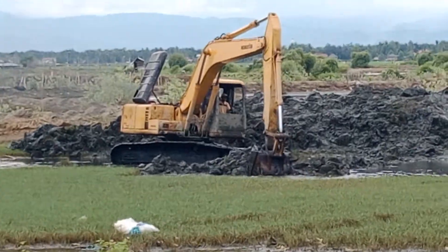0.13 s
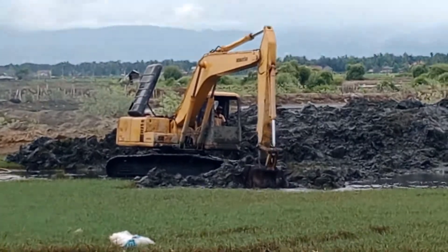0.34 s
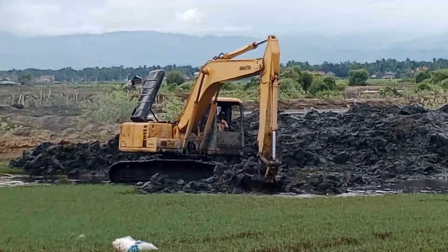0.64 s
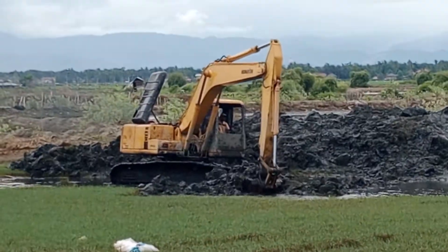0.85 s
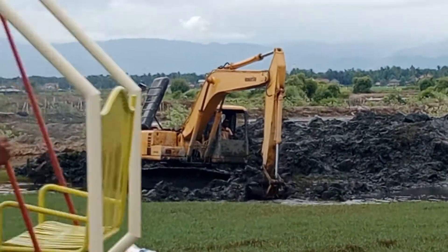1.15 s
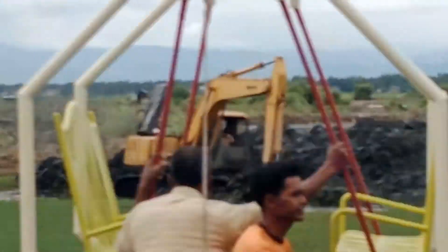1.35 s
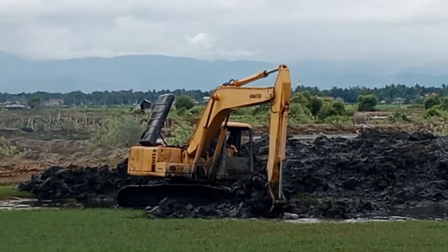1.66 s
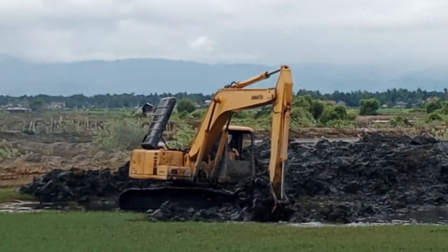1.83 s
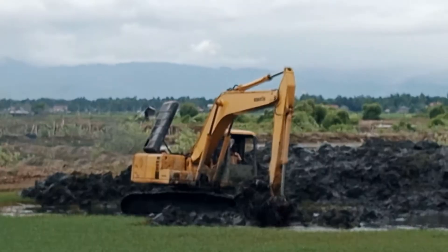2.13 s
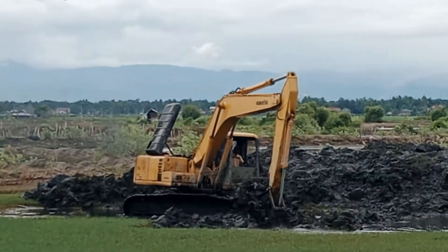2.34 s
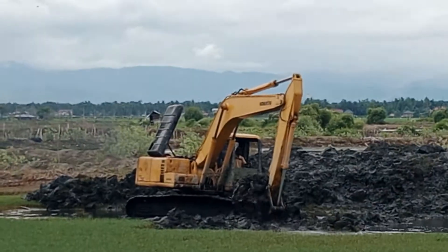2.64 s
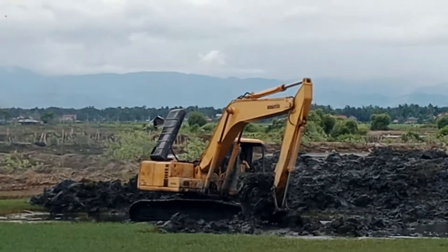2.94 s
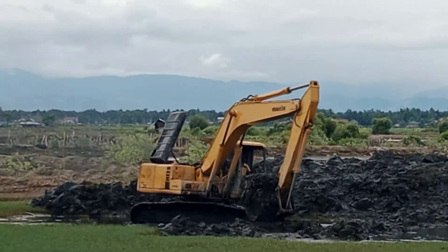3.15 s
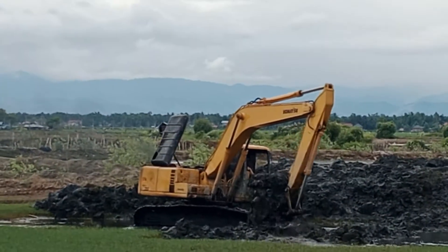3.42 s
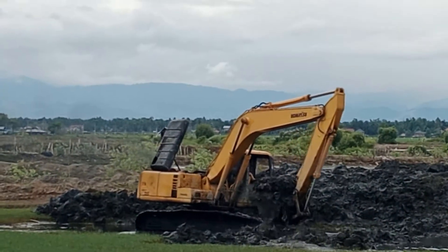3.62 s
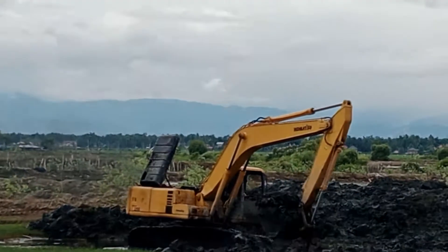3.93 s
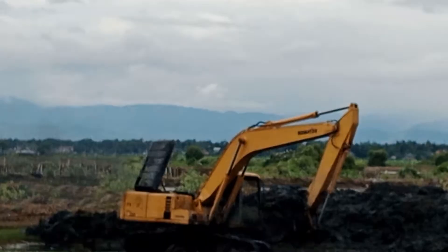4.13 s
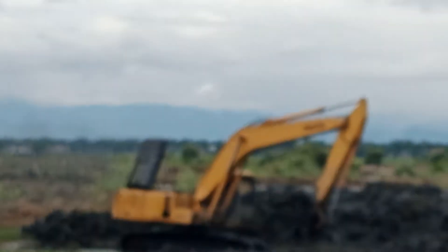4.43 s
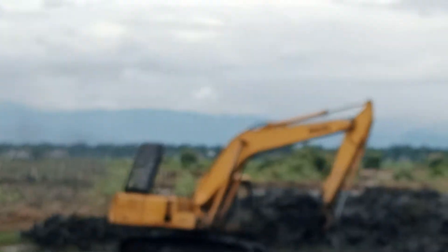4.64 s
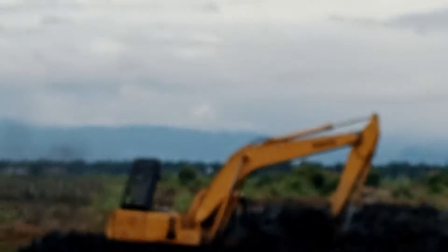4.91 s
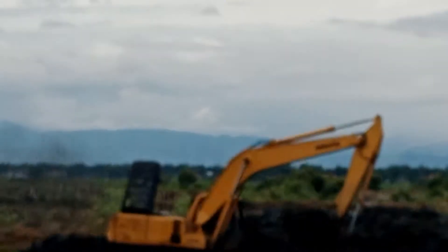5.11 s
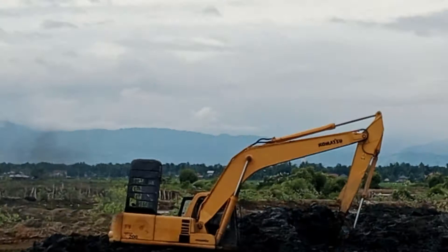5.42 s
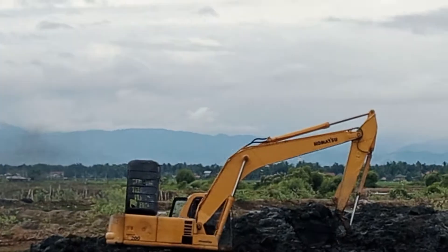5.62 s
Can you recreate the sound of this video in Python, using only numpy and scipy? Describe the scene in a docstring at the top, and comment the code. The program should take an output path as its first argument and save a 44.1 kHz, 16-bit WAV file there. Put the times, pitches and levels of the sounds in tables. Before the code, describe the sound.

A tracked excavator's diesel chugs rapidly outdoors, swelling to a loud clattering roar, then settling to a quieter steady run with ticks and watery bubbling.

```python
"""A diesel excavator chugs across an open field: about 27 beats a second, each a boom, a bark and a puff of gas.
The exhaust is firing pulses and gated noise rung through pipe colours; the block clatters and ticks in shaped noise.
Struck panels ring, a turbocharger hisses, a sine drone and singing oil bands join under load, then bubbles pour.
Sharp ticks, faint chirps and peeps, and low field air sit around it; the ground bounce carves sliding notches."""
import sys
import numpy as np
from scipy import signal
from scipy.fft import rfft, irfft, next_fast_len
from scipy.io import wavfile
from scipy.ndimage import uniform_filter1d, map_coordinates

SR = 44100
rng = np.random.default_rng(int(sys.argv[2]) if len(sys.argv) > 2 else 0)


def persist_wave(psi):
    """Save psi, clipped to +-1, as 16-bit WAV."""
    counts = np.round(np.clip(psi, -1, 1) * 32767).astype(np.int16)
    wavfile.write(sys.argv[1], SR, np.atleast_2d(counts).T)


N = 254456
TIME = np.arange(N) / SR

# Levels in the tables are the moves over time; the functions add their own trims on top.
# Firing speed of the engine: time_s, speed_beats_per_s
ENGINE_SPEED = [(0.0, 27.03), (0.8, 27.21), (1.6, 27.1), (2.4, 27.18), (2.9, 27.3), (3.2, 26.81),
                (3.45, 27.56), (3.8, 27.47), (4.15, 27.36), (4.5, 27.18), (4.9, 27.42), (5.25, 27.61),
                (5.77, 26.81)]
# Effort heard in the exhaust: time_s, boom_db, bark_db
EXHAUST_LEVELS = [(0, -37.5, -38), (0.3, -38, -39.5), (0.65, -30.5, -33), (1.0, -25.5, -30),
                  (1.45, -23.5, -30), (1.95, -22.5, -30.5), (2.15, -24, -35.5), (2.3, -25, -32),
                  (2.55, -29, -36.5), (2.8, -33, -37), (3.25, -40.5, -60), (3.8, -34.5, -59),
                  (4.3, -38.5, -54), (5.0, -38, -58), (5.77, -37, -62)]
# Surges, a few harder or softer firings in a row: time_s, half_length_s, boom_gain_db, bark_gain_db
FIRING_SURGES = [(0.143, 0.042, 6.5, 4), (0.245, 0.015, -1, 4), (0.38, 0.02, 8, 4), (0.532, .016, 1.5, 4),
                 (2.558, 0.067, 5, 2), (2.978, 0.085, 4, -6), (3.093, 0.014, 8.5, 12),
                 (3.34, 0.072, 5, 13.5), (3.453, 0.04, 3, 7), (3.67, .04, 3.5, 6), (3.855, .04, 3, -15),
                 (3.93, 0.046, 0.5, 0), (4.237, 0.042, 8, -1), (4.41, 0.032, -3.5, -5),
                 (4.52, 0.066, 4, 1.5), (4.711, 0.076, -7, 12.5), (5.385, 0.027, 4.5, 4),
                 (5.491, 0.01, 7, 11)]
# Balance of the boom, upper half over lower half: time_s, tilt_db
BOOM_LEAN = [(0, 15), (.12, 12), (.3, -4), (.55, -9), (.85, 5), (1.2, 2.7), (1.5, -8), (1.85, 7.5),
             (2.32, 7), (2.55, 21.5), (2.8, 5), (3.1, -2), (3.5, 0), (3.68, 18), (3.9, 2), (4.3, -4.5),
             (4.9, 1), (5.77, -3.5)]
# Colour of the silencer's boom: frequency_hz, relative_level_db
BOOM_COLOUR = [(12, -55), (27, -49), (54, -26), (82, -23), (109, -1), (136, 12.5), (163, 9.5), (190, 6.5),
               (220, -52), (300, -10.5), (600, -53.5), (3000, -120)]
# Colour of the pipe's bark: frequency_hz, relative_level_db
BARK_COLOUR = [(25, -27), (55, -33.5), (90, 9.5), (180, -28.5), (275, 5.5), (410, -2.5), (520, -9),
               (680, -15), (1000, -34.5), (1600, -26.5), (3000, -57), (7000, -120)]
# Colour of the gas puffs: frequency_hz, relative_level_db
GAS_COLOUR = [(12, -43), (35, -28), (70, -21.5), (200, -2.5), (320, 4.5), (450, 5.5), (600, 1), (800, -3.5),
              (1100, -35), (1600, -23), (3000, -59), (7000, -91)]
# Colour of the rumble under the boom: frequency_hz, relative_level_db
RUMBLE_COLOUR = [(25, -36), (50, -10), (78, -3), (110, 10), (250, -39.5)]
# Noises of the engine block: time_s, clatter_db, rasp_db, hiss_db, tick_spray_db
BLOCK_LEVELS = [(0, -45.5, -68.5, -60.5, -76), (0.35, -44, -66, -56, -79), (0.41, -42.5, -60, -54.5, -64),
                (0.55, -41.5, -61, -52.5, -66), (0.8, -41, -62.5, -51, -58), (1.2, -38.5, -60, -47.5, -53),
                (1.65, -40.5, -51.5, -46.5, -60), (1.9, -40, -53, -46, -60), (2.0, -44, -52, -48, -71),
                (2.08, -42, -51, -44, -59), (2.15, -44, -55, -50, -67), (2.35, -43, -55, -46.5, -58.5),
                (2.75, -47.5, -56, -50.5, -63), (3.15, -50.5, -74.5, -54.5, -74.5),
                (4.1, -55, -74.5, -57.5, -81.5), (4.7, -52.5, -76.5, -56.5, -76),
                (4.9, -51, -76, -56.5, -77), (5.3, -48, -78.5, -54.5, -72), (5.53, -50.5, -80, -52.5, -68),
                (5.61, -46.5, -84, -50, -63), (5.77, -45.5, -74, -47.5, -60)]
# Colour of the clatter: frequency_hz, relative_level_db
CLATTER_COLOUR = [(400, -12.5), (800, -6), (1150, 1), (1500, 1), (2000, -2.5), (2300, -10), (2700, -20),
                  (4000, -90), (6000, -45.5)]
# Colour of the rasp: frequency_hz, relative_level_db
RASP_COLOUR = [(1500, 2.5), (2300, 3), (2800, 0.5), (3400, -1.5), (4000, -1.5), (4400, -8.5), (4800, -26.5),
               (5600, -2.5), (6500, -28), (9000, -29)]
# Colour of the hiss: frequency_hz, relative_level_db
HISS_COLOUR = [(4000, -26), (4900, -12.5), (5700, 2.5), (6500, 4), (7600, 8.5), (8600, 8.5), (9300, -0.5),
               (10100, 0), (11300, -35), (15500, -45)]
# Colour of the tick spray: frequency_hz, relative_level_db
SPRAY_COLOUR = [(5000, -36.5), (8000, 3), (10500, 3.5), (11500, -0.5), (12700, 4), (14200, -7), (15500, -8)]
# Brief swells and lulls of the clatter and the oil: time_s, half_length_s, gain_db
BRIEF_SWELLS = [(.62, .1, 1.5), (2.17, .035, -5), (2.59, .05, 4), (2.83, .04, -4), (2.95, .05, 2),
                (3.16, .02, -4), (3.29, .035, -7), (3.42, .06, 2), (3.62, .04, -3.5), (3.76, .035, -6),
                (3.87, .05, 3), (4.04, .02, -3), (4.12, .03, 2), (5.62, .05, 2)]
# Ground bounce, where a negative depth lifts: time_s, notch_hz, notch_depth_db, upper_depth_db, low_depth_db
GROUND_BOUNCE = [(0, 2930, 7, 12, 19), (.7, 2920, 17.5, 18, 0), (1.1, 3180, 8, 9, -4),
                 (1.45, 3900, 18, 11, -6.5), (1.75, 4420, 33, 10.5, -6.5), (2.15, 4720, 30, -4, -1),
                 (3.2, 5080, 32, -5, 5), (3.9, 5240, 31, -9, 4), (4.7, 5850, 22, -5, 2.5),
                 (5.77, 6020, 22, -7.5, -1)]
# Spells of a ringing pipe or panel: start_s, end_s, first_pitch_hz, last_pitch_hz, level_db
PANEL_RINGS = [(.04, .95, 760, 755, -43.5), (.3, 1.3, 505, 515, -45), (0, .55, 1430, 1430, -51),
               (0, .75, 2730, 2730, -65), (.15, 1.0, 405, 405, -44.5), (.7, 1.35, 1140, 1140, -45),
               (2.15, 2.7, 910, 870, -46), (2.68, 3.0, 875, 890, -45.5), (3.0, 3.17, 900, 980, -51),
               (3.27, 3.52, 985, 1000, -53), (2.7, 3.55, 300, 320, -44), (3.44, 3.98, 410, 405, -52),
               (3.55, 4.5, 325, 325, -52), (3.18, 3.84, 790, 805, -54), (3.84, 4.85, 790, 790, -64),
               (4.45, 5.45, 7790, 7790, -62), (5.57, 5.68, 610, 630, -50), (5.63, 5.85, 1010, 990, -48),
               (3.86, 3.99, 440, 440, -56), (4.65, 4.74, 510, 510, -54)]
# Two singing resonances of the oil: time_s, lower_hz, lower_db, upper_hz, upper_db
OIL_SONG = [(2.7, 1480, -64, 2000, -60), (3.0, 1440, -62, 1980, -54), (3.42, 1480, -55, 2010, -55),
            (3.7, 1450, -58, 1960, -56), (3.9, 1500, -59, 1990, -55), (4.15, 1450, -57, 1980, -54),
            (4.52, 1520, -56, 1890, -52), (4.7, 1500, -52, 1880, -59), (4.94, 1300, -57, 1900, -57),
            (5.06, 1170, -49, 1870, -51), (5.26, 1270, -49, 1830, -49), (5.32, 1220, -50, 1900, -59),
            (5.41, 1190, -44.5, 1900, -59), (5.53, 1090, -49, 1800, -58), (5.6, 1080, -49, 1850, -51),
            (5.77, 1010, -48, 1780, -52)]
# Muddy water pouring from the lifted bucket: time_s, level_db
POUR_LEVEL = [(4.6, -72), (4.82, -56), (4.94, -61), (5.04, -52), (5.26, -49), (5.33, -58), (5.45, -55),
              (5.55, -57), (5.63, -42), (5.7, -46), (5.77, -50)]
# Sharp metal ticks: start_s, peak_db, pitch_hz
METAL_TICKS = [(3.468, -41, 8200), (4.425, -48.5, 11060), (4.616, -44.5, 8640), (4.6455, -48, 7950),
               (4.725, -45, 8000), (4.7632, -44, 8200), (4.777, -35.5, 8570), (4.8808, -46, 8240),
               (4.9193, -44, 7950), (4.958, -40, 7950), (4.993, -42, 8100), (4.991, -45, 11200),
               (5.114, -47, 8500), (5.1821, -35.5, 8450), (5.355, -49, 10700), (5.3886, -40, 8230),
               (5.56, -49, 10600), (5.573, -41.5, 8600), (5.6167, -40, 9000), (5.622, -45, 11000),
               (5.691, -41.5, 8600), (5.724, -40, 10600)]
# Faint high chirps: time_s, level_db
CHIRP_LEVEL = [(2.85, -110), (2.93, -77), (3.22, -80), (3.32, -91), (3.75, -83), (4.1, -89), (4.22, -78),
               (5.05, -80), (5.2, -76), (5.77, -76)]
# Faint, lone peeps: time_s, half_length_s, pitch_hz, peak_db
LONE_PEEPS = [(4.07, .02, 3700, -68), (4.27, .012, 6300, -67), (4.966, .009, 5330, -63)]
# Colour of the field air: frequency_hz, relative_level_db
AIR_COLOUR = [(15, -50), (32, -24), (60, 0), (150, 15.5), (400, -15.5), (800, -38.5), (2000, -27),
              (3200, -57), (4300, -53), (4900, -47), (9000, -58), (16000, -55)]

START_TURN = .895  # place in the firing cycle at the start; one turn is one beat
BOOM_PEAK_TURN, BARK_TURN, BARK_JITTER_TURN = .32, .11, .003
FULL_DB, SLACK_RANGE_DB = -20, 18  # boom level with no slack, and the fall from there to fully slack
HUNT_PER_S, HUNT_DB = 14, 1.5  # a slack engine hunts at random
VARY_BAND_HZ, VARY_DB = 190, 3.5  # every beat has its own colour, in bands about this wide
LEAN_HZ = 150  # splits the boom into lower and upper half
SPRAY_BURSTS_PER_S, SPRAY_BURST_DB = 24, 3.3
UPPER_NOTCH_RATIO, LOW_DIP_HZ = 2.033, 940
RING_FADE_S = .07
TURBO_PEAK_S, TURBO_SWELL_S, TURBO_HZ, TURBO_WIDTH_HZ, TURBO_DB = 1.39, 0.55, 9960, 530, -53
DRONE_HZ, DRONE_DB, DRONE_FULL_S = 85.3, -39, 4.37
DRONE_RISE_DB_PER_S, DRONE_EASE_DB_PER_S = 23, 1
OIL_WIDTH_HZ, OIL_FLUTTER_DB = 160, 2.4
POUR_LOW_HZ, POUR_HIGH_HZ, BUBBLES_PER_S = 1050, 2100, 480
BUBBLE_CYCLES, BUBBLE_GLIDE = 13, .05  # fade in cycles, and rise as a share of the phase
CHIRP_HZ, CHIRP_WIDTH_HZ, CHIRPS_PER_S = 4380, 170, 12.5
TOP_HZ = 15650


def exhaust(turn, pipe_s=0.00882, reflection=0.32):
    """Each beat booms in the silencer, barks from the pipe and lets out a rumbling puff of gas."""
    boom_db, bark_db, slack = effort_levels()
    # a hard-working engine fires evenly, a slack one stumbles
    strength = scatter(turn, .5 + 1.36 * slack)
    boom_kicks = -strokes(turn - BOOM_PEAK_TURN) * strength
    boom = lean(colour(boom_kicks, BOOM_COLOUR, causal=False))

    # the pulse runs down the pipe and comes back once
    kicks = -strokes(turn - BARK_TURN + BARK_JITTER_TURN * walk(12)) * strength
    returned = np.interp(TIME - pipe_s, TIME, kicks)
    bark = colour(kicks + reflection * returned, BARK_COLOUR)

    puff = gate(turn, start=.04, decay=.28, rest=.24, attack=.08)
    gas = colour(noise() * puff, GAS_COLOUR)
    rumble = colour(noise() * puff, RUMBLE_COLOUR)
    boom = boom + undb(-27) * rumble
    pipe = undb(-2 - 2.0 * slack) * bark + undb(-4.8) * vary(gas, turn)
    # slack pulls both parts down further
    boom_gain = undb(boom_db + 0.5 - 2.0 * slack)
    pipe_gain = undb(bark_db - 1.0 - 3.4 * slack)
    return boom_gain * boom + ground(pipe_gain * pipe)


def effort_levels():
    """Boom and bark levels in dB with surges and hunting, and how slack the engine runs (0-1)."""
    boom_db, bark_db = curves(EXHAUST_LEVELS)
    slack = np.clip((FULL_DB - boom_db) / SLACK_RANGE_DB, 0, 1)
    hunt_db = HUNT_DB * slack * walk(HUNT_PER_S)
    for s, half_s, boom_gain_db, bark_gain_db in FIRING_SURGES:
        swell = np.exp(-((TIME - s) / half_s) ** 2)
        boom_db = boom_db + boom_gain_db * swell
        bark_db = bark_db + bark_gain_db * swell
    return boom_db + hunt_db, bark_db + hunt_db, slack


def strokes(turn):
    """One impulse at the start of every beat."""
    return np.diff(np.floor(turn), prepend=0)


def scatter(turn, spread_db):
    """Every beat has its own strength, reached without a click."""
    db = spread_db * rng.standard_normal(256)[turn.astype(int) % 256]
    return undb(uniform_filter1d(uniform_filter1d(db, size=128), size=128))


def gate(turn, start, decay, rest, attack):
    """Opens once a beat and dies away to a resting share; start, attack and decay in turns."""
    age = (turn - start) % 1
    return unit(rest + np.exp(-age / decay) * (1 - np.exp(-age / attack)))


def lean(x):
    """Tips the weight of the boom toward its upper or its lower harmonics."""
    low = signal.sosfiltfilt(signal.butter(6, LEAN_HZ, fs=SR, output="sos"), x)
    tilt = undb(curves(BOOM_LEAN)[0])
    return (low + tilt * (x - low)) / np.sqrt((1 + tilt ** 2) / 2)


def vary(x, turn):
    """No two firings are alike: each beat favours other resonances."""
    f, s, spectrum = signal.stft(x, SR, nperseg=512)
    place = np.broadcast_arrays(f[:, None] / VARY_BAND_HZ, np.interp(s, TIME, turn))
    # random gains on a grid of bands and beats, blended between neighbours
    grid = rng.standard_normal((128, 256))
    gain = undb(VARY_DB * map_coordinates(grid, place, order=1, mode="wrap"))
    return signal.istft(spectrum * unit(gain), SR)[1][:N]


def block(turn, locked=0.21):
    """Gears and valves clatter all round the turn; the treble is a spray of grains bunched on the beat."""
    clatter_db, rasp_db, hiss_db, spray_db = curves(BLOCK_LEVELS)
    # part of the rattle comes back at the same place in every turn
    pattern = rng.standard_normal(1024)
    rattle = unit(np.interp(turn % 1, np.linspace(0, 1, len(pattern)), pattern))

    knock = gate(turn, start=.39, decay=.09, rest=.8, attack=.04)
    clatter_grain = undb(1.4 * walk(200))
    clatter = colour((noise() + locked * rattle) * clatter_grain * knock, CLATTER_COLOUR)

    scrape = gate(turn, start=.1, decay=.3, rest=.8, attack=.05)
    rasp_grain = undb(1.4 * walk(400) + 1.0 * walk(20))
    rasp = colour((noise() + locked * rattle) * rasp_grain * scrape, RASP_COLOUR)

    jet = gate(turn, start=0, decay=.14, rest=.9, attack=.07)
    hiss_grain = undb(2.26 * walk(700) + 1.15 * walk(50))
    hiss = colour(noise() * hiss_grain * jet, HISS_COLOUR)

    # a dense spray is more even, a thin one comes in stronger bursts
    thin = np.clip((-52 - spray_db) / 20, .35, 1)
    spray_grain = undb(4.1 * walk(600) + SPRAY_BURST_DB * thin * walk(SPRAY_BURSTS_PER_S))
    shower = gate(turn, start=0, decay=.18, rest=.52, attack=.09)
    spray = colour(noise() * spray_grain * shower, SPRAY_COLOUR)

    # effort lifts the block's noises but holds the spray back
    effort = np.clip((clatter_db + 51.0) / 10, 0, 1)
    return (undb(clatter_db - 3.0 + 2.94 * effort) * swells() * clatter
            + undb(rasp_db + 5.5 + 6.3 * effort) * rasp
            + undb(hiss_db - 3.0 + 0.76 * effort) * hiss
            + undb(spray_db + 5.0 - 1.5 * effort) * spray)


def swells():
    """Gain of the brief swells and lulls, each a bell-shaped move in dB."""
    return undb(sum(db * np.exp(-((TIME - s) / half_s) ** 2) for s, half_s, db in BRIEF_SWELLS))


def paths(x, strength=0.28, count=5):
    """Short echoes off the machine drift in delay, so ripples glide through the colour."""
    lags_s = np.geomspace(.0014, .006, count)
    echoes = sum(np.interp(TIME - lag - .0002 * walk(2.5), TIME, x) for lag in lags_s)
    return (x + strength * echoes) / np.sqrt(1 + count * strength ** 2)


def ground(x, main_width=0.18, upper_width=0.12, low_width=0.16):
    """The wave off the ground cancels the direct one in notches; widths are natural-log frequency ratios."""
    f, s, spectrum = signal.stft(x, SR, nperseg=1024)
    notch_hz, main_db, upper_db, low_db = curves(GROUND_BOUNCE, s)
    notches = [(notch_hz, main_db, main_width),
               (UPPER_NOTCH_RATIO * notch_hz, upper_db, upper_width),
               (LOW_DIP_HZ, low_db, low_width)]
    for hz, depth_db, width in notches:
        distance = np.log((f[:, None] + 1) / hz) / width
        spectrum = spectrum * undb(-depth_db * np.exp(-distance ** 2))
    return undb(0.26) * signal.istft(spectrum, SR)[1][:N]


def panels(turn, struck=0.43, width_hz=95):
    """Every beat strikes pipes and panels into a short ring, blended with a noise-driven resonance."""
    since_beat_s = (turn % 1) / curves(ENGINE_SPEED)[0]
    fade = np.tanh(8 * np.sin(np.pi * turn) ** 2)  # silent at the seam between beats
    rings = 0
    for start, end, first_hz, last_hz, db in PANEL_RINGS:
        hz = np.interp(TIME, [start, end], [first_hz, last_hz])
        strike = struck * np.sin(2 * np.pi * hz * since_beat_s) * fade
        ring = strike + 0.33 * band(hz, width_hz)
        spell = np.clip(.5 + np.minimum(TIME - start, end - TIME) / RING_FADE_S, 0, 1)
        rings = rings + undb(db) * spell * unit(ring * scatter(turn, spread_db=2.04))
    beat = gate(turn, start=.08, decay=.35, rest=.4, attack=.09)
    soft_beat = signal.sosfilt(signal.butter(2, 300, fs=SR, output="sos"), beat)
    return undb(-2.5) * rings * soft_beat


def turbo():
    """The turbocharger hisses as a narrow band of air that swells while the engine pulls up, then fades."""
    swell = np.exp(-((TIME - TURBO_PEAK_S) / TURBO_SWELL_S) ** 4)
    level = undb(TURBO_DB + 3.4 * walk(29.4))
    return level * swell * band(np.full(N, TURBO_HZ), TURBO_WIDTH_HZ)


def drone(wander=0.01466, waver_db=1.5):
    """Smooth low note with a weak octave; swells as the boom takes the load, then eases."""
    age = TIME - DRONE_FULL_S
    db = DRONE_DB + np.minimum(DRONE_RISE_DB_PER_S * age, -DRONE_EASE_DB_PER_S * age)
    phase = 2 * np.pi * np.cumsum(DRONE_HZ * (1 + wander * walk(9.6))) / SR
    note = np.sin(phase) + undb(-20.0) * np.sin(2 * phase)
    return np.sqrt(2) * undb(db + waver_db * walk(24)) * note


def oil():
    """Oil sings through the valves; as the boom rises both resonances sink and the lower one takes over."""
    lower_hz, lower_db, upper_hz, upper_db = curves(OIL_SONG)
    song = 0
    for hz, db in ((lower_hz, lower_db), (upper_hz, upper_db)):
        song = song + band(hz, OIL_WIDTH_HZ) * undb(db + OIL_FLUTTER_DB * walk(35))
    return undb(-3) * swells() * song


def pour(spread_db=5):
    """Water falls into the mud as a crowd of short, rising bubbles."""
    out = np.zeros(N + 1024)
    age = np.arange(1024) / SR
    first_s, last_s = POUR_LEVEL[0][0], TIME[-1]
    length_s = last_s - first_s
    for when, pitch, size in rng.random((int(BUBBLES_PER_S * length_s), 3)):
        cycles = age * POUR_LOW_HZ * (POUR_HIGH_HZ / POUR_LOW_HZ) ** pitch
        # the second term closes the tail before the buffer ends
        life = cycles / BUBBLE_CYCLES + (age / age[-1]) ** 8 * 5
        tone = np.sin(2 * np.pi * cycles * (1 + BUBBLE_GLIDE * np.tanh(life / 2)))
        bubble = tone * np.exp(-life) * np.tanh(cycles / 2) ** 2
        start = int((first_s + when * length_s) * SR)
        # many small bubbles, few big ones
        out[start:start + len(age)] += undb(spread_db * min(-np.log(1 - size), 3)) * bubble
    loudness = np.std(out[int(first_s * SR):N])
    return undb(curves(POUR_LEVEL)[0] - 3.5) * out[:N] / loudness


def ticks(t60=0.034, attack_s=0.00017, width_hz=1100):
    """Small hard metal contacts: short noise strikes ringing through a narrow band; t60 in seconds."""
    out = np.zeros(N)
    age = np.arange(4096) / SR
    for s, db, hz in METAL_TICKS:
        body = signal.butter(2, [hz - width_hz / 2, hz + width_hz / 2], "band", fs=SR, output="sos")
        decay = undb(-60 * age / t60)
        strike = rng.standard_normal(len(age)) * decay * (1 - np.exp(-age / attack_s))
        ring = signal.sosfilt(body, signal.sosfilt(body, strike))
        tick = undb(db + 1.5) * ring / np.abs(ring).max()
        start = int(s * SR)
        out[start:start + len(age)] += tick[:N - start]
    return out


def chirps():
    """Short, breathy chirps: a narrow noise band pulsed at uneven intervals."""
    count = np.cumsum(CHIRPS_PER_S * np.exp(.45 * walk(16))) / SR
    pulse = np.sin(np.pi * count) ** 2 * scatter(count, 2.5)
    breath = band(np.full(N, CHIRP_HZ), CHIRP_WIDTH_HZ)
    return undb(curves(CHIRP_LEVEL)[0] - 3) * unit(pulse * breath)


def peeps():
    """Faint whistled notes, each a sine under a bell-shaped swell."""
    out = 0
    for s, half_s, hz, db in LONE_PEEPS:
        swell = np.exp(-((TIME - s) / half_s) ** 2)
        out = out + undb(db) * swell * np.sin(2 * np.pi * hz * TIME)
    return out


def field_air():
    """Open air as low coloured noise that gently wavers."""
    return undb(-45) * colour(noise(), AIR_COLOUR) * undb(2 * walk(7.2))


def undb(db):
    """Decibels to gain."""
    return 10 ** (np.asarray(db) / 20)


def unit(x):
    """Scale to rms 1."""
    return x / np.sqrt(np.mean(x ** 2))


def curves(table, at=TIME):
    """The columns of a table, joined by straight lines in time."""
    s, *columns = np.transpose(table)
    return [np.interp(at, s, c) for c in columns]


def noise():
    """White noise."""
    return rng.standard_normal(N)


def walk(rate):
    """Smoothed random motion of rms 1, with about `rate` new values a second."""
    k = int(SR / rate)
    steps = np.repeat(rng.standard_normal(N // k + 1), k)[:N]
    return unit(uniform_filter1d(uniform_filter1d(steps, k), k))


def colour(x, points, causal=True):
    """Ring x through a body of the given colour, to rms 1; if not causal, a kick swells as slowly as it fades."""
    size = 2 * next_fast_len(N)
    hz, db = np.transpose(points)
    f = np.arange(size // 2 + 1) * SR / size
    response = undb(np.interp(np.log(f + 1), np.log(hz), db))
    cepstrum = irfft(np.log(response))
    if causal:
        # fold the cepstrum forward: minimum phase, so all ringing follows the kick
        cepstrum[1:size // 2] *= 2
        cepstrum[size // 2 + 1:] = 0
    return unit(irfft(rfft(x, size) * np.exp(rfft(cepstrum)))[:N])


def band(hz, width_hz):
    """A noise-driven resonance whose centre may move: slow complex noise carried up to hz."""
    lowpass = signal.butter(2, width_hz / 2, fs=SR, output="sos")
    slow = signal.sosfilt(lowpass, noise() + 1j * noise())
    return unit(np.real(slow * np.exp(2j * np.pi * np.cumsum(hz) / SR)))


def scene():
    """The machine and the open air around it."""
    turn = START_TURN + np.cumsum(curves(ENGINE_SPEED)[0]) / SR
    block_outdoors = ground(paths(vary(block(turn), turn)))
    engine = exhaust(turn) + block_outdoors + panels(turn) + turbo()
    work = drone() + oil() + pour() + ticks()
    background = chirps() + peeps() + field_air()
    return (engine + work + background)[None]


def record(dry):
    """The recorder cuts the top with a steep low-pass."""
    return signal.sosfilt(signal.ellip(10, .2, 80, TOP_HZ, fs=SR, output="sos"), dry)


dry = scene()
out = record(dry)
persist_wave(out)
```